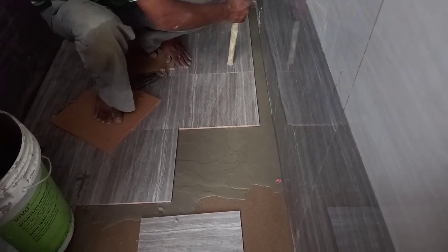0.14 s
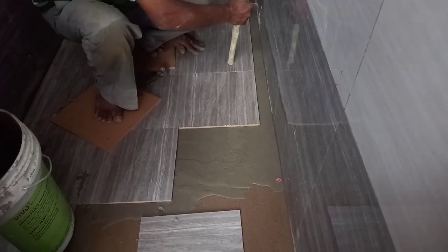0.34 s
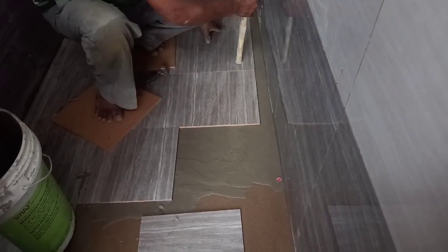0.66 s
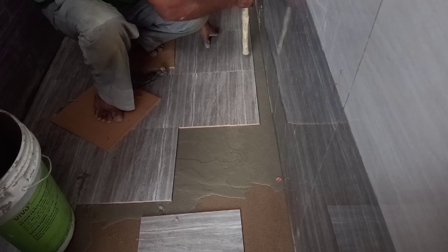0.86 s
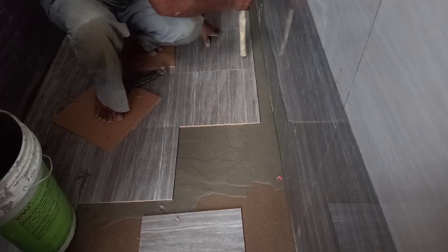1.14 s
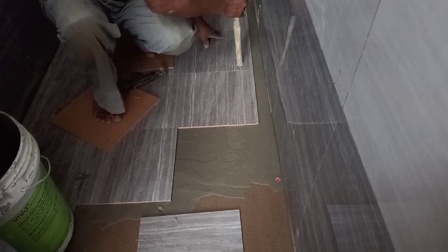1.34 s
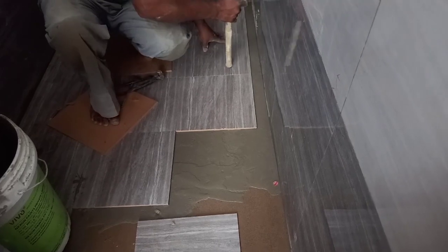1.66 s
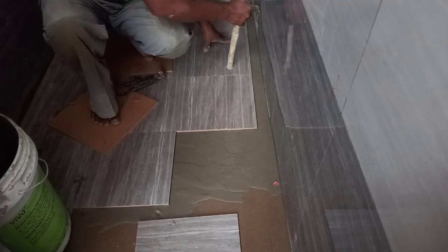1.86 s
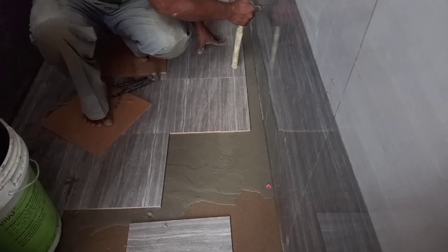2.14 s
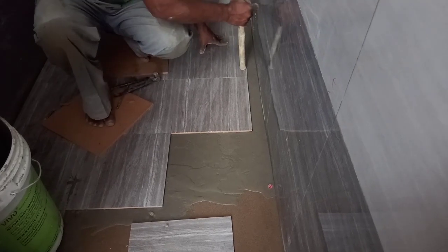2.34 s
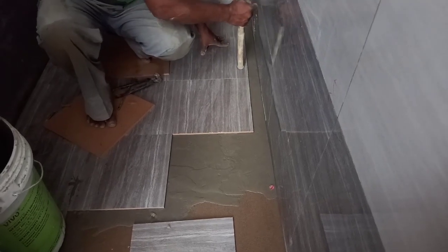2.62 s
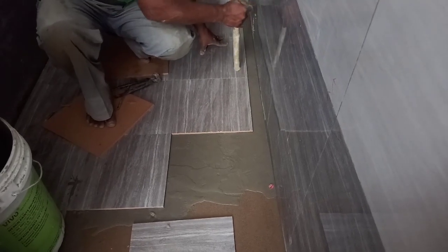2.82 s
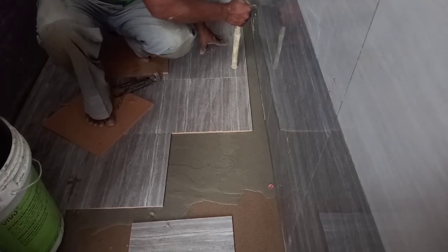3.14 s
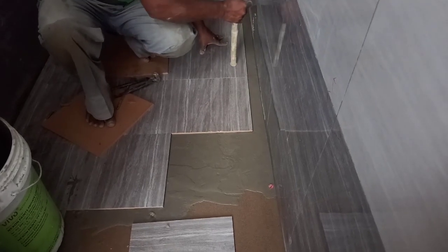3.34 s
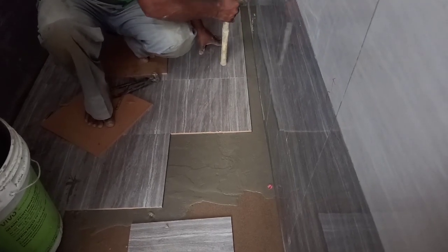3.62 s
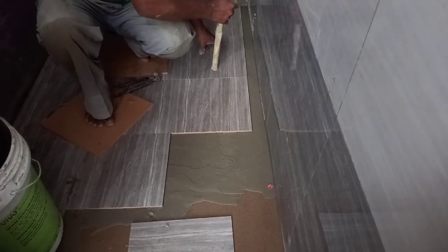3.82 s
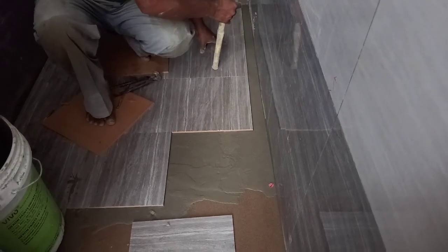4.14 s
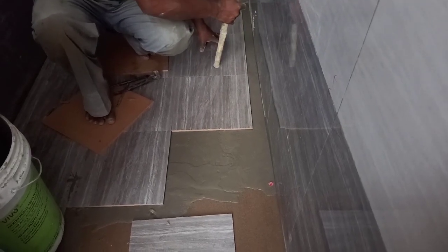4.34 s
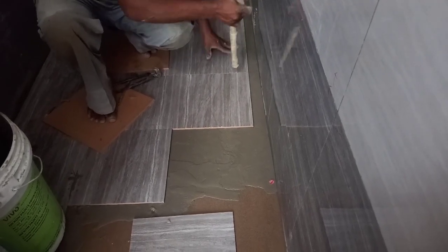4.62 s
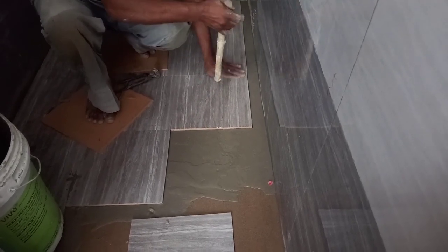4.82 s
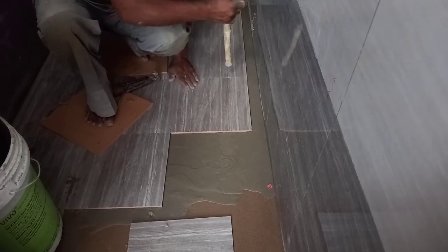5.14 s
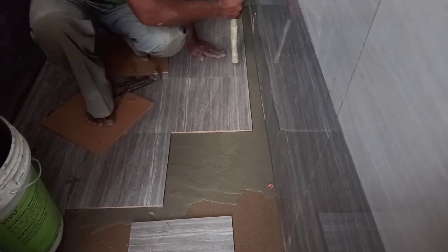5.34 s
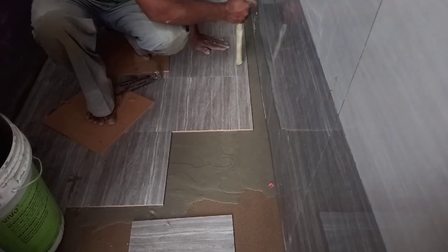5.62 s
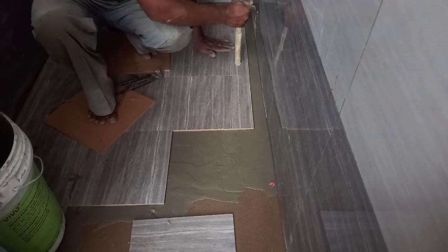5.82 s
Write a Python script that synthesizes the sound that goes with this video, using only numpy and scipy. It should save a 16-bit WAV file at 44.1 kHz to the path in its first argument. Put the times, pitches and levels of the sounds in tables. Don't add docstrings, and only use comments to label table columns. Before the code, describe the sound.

A small, bare, tiled room heard from about a metre away. From the start a far engine thumps and drones low through the walls, wavering in pitch and strength, with quiet room air and a soft breathy hiss that swells in short strokes. At 0.3 s a wooden handle begins knocking a floor tile into wet mortar: hard, hollow clacks with a gritty crack, a very brief tile ring and a short bright room echo. Blows come at 0.3, 0.65 and 0.95 s, then about every quarter second until 4.0 s, the last three stronger and duller. A pause follows, the drone growing and faint distant metal clanking and rattling from 4.2 s. Two more knocks land at about 5.2 and 5.4 s, then engine, hiss and further faint clanks from 5.6 s to the end at 6 s. Sound is on the left only, clipping on blows; the right holds faint steady electronic hiss.

```python
import sys
import numpy as np
from scipy import signal
from scipy.fft import rfft, irfft
from scipy.io import wavfile
from scipy.ndimage import uniform_filter1d

SR = 44100
rng = np.random.default_rng(int(sys.argv[2]) if len(sys.argv) > 2 else 0)


def to_wav(s):
    ch = np.atleast_2d(s).T
    pcm = np.round(np.clip(ch, -1, 1) * 32767)
    wavfile.write(sys.argv[1], SR, pcm.astype(np.int16))


def invert_db(level):
    return 10 ** (np.asarray(level, dtype=float) / 20)


N = 263718


def shape(x, points):
    hz, db = np.transpose(points)
    f = np.fft.rfftfreq(len(x), 1 / SR) + 1
    gain = invert_db(np.interp(np.log(f), np.log(hz), db))
    return irfft(rfft(x) * gain, len(x))


def level(x, db):
    return x * invert_db(db) / np.sqrt(np.mean(x ** 2))


def noise(colour):
    return shape(rng.standard_normal(N), colour)


def ring(t, hz, t60, phase=0):
    return np.sin(2 * np.pi * hz * t + phase) * np.exp(-np.log(1000) * t / t60)


def curve(rows):
    s, *columns = np.transpose(rows)
    return [np.interp(np.arange(N) / SR, s, c) for c in columns]


def walk(rate):
    k = int(SR / rate)
    steps = np.repeat(rng.standard_normal(N // k + 1), k)
    drift = uniform_filter1d(uniform_filter1d(steps, k), k)[:N]
    return drift / drift.std()


def engine(smear=0.57, rumble_db=-9):
    # (time [s], firing rate [Hz], thump level [dB], tenth-order drone level [dB])
    running = [(0, 17, -47.5, -49), (.5, 18.2, -43, -47), (1.5, 14.6, -51, -40.5), (2.5, 16.9, -42, -40.5),
               (3.5, 15.9, -43, -42), (4.2, 16.15, -39.5, -41.5), (4.5, 16.4, -40.5, -37.5),
               (4.8, 16.25, -42.5, -37), (5.1, 16.2, -37.5, -34.5), (5.5, 16.4, -36, -46),
               (5.98, 16.2, -35.5, -49)]
    # (order of the firing rate, level [dB])
    exhaust = [(5, -5), (6, -4.5), (7, -3.5), (8, 2.5), (9, -2.5), (10, -4), (11, -6), (12, -11), (13, -13),
               (14, -9.5), (15, -11.5), (17, -16), (18, -29), (20, -15.5)]
    # (frequency [Hz], gain [dB])
    rumble_colour = [(50, -23), (90, -5), (160, -9), (260, -19), (400, -23)]
    hz, thump_db, drone_db = curve(running)
    turns = 2 * np.pi * np.cumsum(hz / SR)
    orders = 0
    for order, db in exhaust:
        loudness = invert_db(db + 1.5 * walk(4))
        orders = orders + loudness * np.cos(np.round(order) * turns + smear * walk(.7))
    rumble = level(noise(rumble_colour), rumble_db)
    thump = level(orders, 0) + rumble
    drone = np.sqrt(2) * np.sin(10 * turns + .4 * walk(8)) * invert_db(1.5 * walk(10))
    return thump * invert_db(thump_db) + drone * invert_db(drone_db)


def hiss(gain_db=7, rise_db_s=117, fall_db_s=73, rest_db=-55.5):
    # (start of hold [s], hold [s], level [dB])
    strokes = [(0.0, 0.26, -51), (0.5, 0.041, -44), (1.23, 0.11, -48), (1.755, .12, -46),
               (2.64, 0.094, -43), (3.166, .2, -45.5), (3.6, 0.049, -52.5), (4.256, 0.1, -41.5),
               (4.46, 0.34, -45), (4.844, 0.24, -43), (5.313, 0.13, -46), (5.63, 0.061, -44),
               (5.826, .2, -42.5)]
    # (frequency [Hz], gain [dB])
    hiss_colour = [(700, -6.5), (2000, -15), (4000, -8.5), (7000, 2), (8300, 8), (8800, -8.5), (10500, -3),
                   (13500, -9)]
    t = np.arange(N) / SR
    envelope_db = np.full(N, rest_db)
    for s, hold, top_db in strokes:
        rise_db = rise_db_s * np.maximum(s - t, 0)
        fall_db = fall_db_s * np.maximum(t - s - hold, 0)
        envelope_db = np.maximum(envelope_db, top_db - rise_db - fall_db)
    return level(noise(hiss_colour), gain_db) * invert_db(envelope_db + walk(7.2))


def air():
    # (frequency [Hz], gain [dB])
    air_colour = [(50, 13), (90, -7), (200, 6.5), (500, -3.5), (1000, -1.5), (2500, -14), (15000, -47)]
    return level(noise(air_colour), -49.5) * invert_db(walk(27))


def crack(chance, crack_s=0.0019):
    # (frequency [Hz], gain [dB])
    crack_colour = [(600, -26), (1800, -74), (2800, 18), (4500, 13.5), (7000, 9), (9000, 6), (13000, -15)]
    decay = np.exp(-np.arange(len(chance)) / SR / crack_s)
    burst = rfft(chance * decay)
    return shape(irfft(burst / abs(burst), len(chance)), crack_colour)


def tail(t):
    # (frequency [Hz], t60 [s])
    room_decay = [(80, 0.86), (200, 0.65), (500, 0.42), (1200, 0.33), (3000, 0.32), (6000, .25),
                  (12000, 0.078)]
    # (frequency [Hz], gain [dB])
    tail_colour = [(100, -11), (200, 6.5), (400, 0), (800, 3.5), (1600, 4), (3000, 4.5), (6000, 4.5),
                   (14000, 30)]
    hz, t60 = np.transpose(room_decay)
    spectrum, out = rfft(rng.standard_normal(len(t))), 0
    octave = np.log2(np.fft.rfftfreq(len(t), 1 / SR) + 1)
    for centre in np.arange(6, 14.6, .5):
        band = irfft(spectrum * np.clip(1 - 2 * abs(octave - centre), 0, 1), len(t))
        band_t60 = np.interp(centre, np.log2(hz), t60)
        out = out + band * np.exp(-np.log(1000) * t / band_t60)
    return shape(out, tail_colour)


def room(t, count, tail_db=-33, modes_db=-49, early_db=-27, early_t60=0.092, spot_db=3.5, build_s=.004):
    # (delay [s], level [dB])
    echoes = [(.0017, -4), (.0046, -5), (.0097, -25.5), (.0167, -10.5), (.0282, -11.5)]
    # (frequency [Hz], level [dB], t60 [s])
    standing = [(89.2, -1, 0.7), (152.93, -0.5, 0.72), (183.1, 7.5, 0.45), (231, 0, 0.18), (267, -1, 0.14),
                (323.2, 1.5, 0.32), (395.2, 3.5, 0.27), (464.2, -5.5, 0.35), (536, -7, 0.39),
                (614, -15, 0.42), (656.6, -11.5, 0.45), (809, -3.5, 0.29), (882, -19.5, 0.83),
                (1072, -21, 0.48)]
    direct = np.zeros(len(t))
    direct[0] = 1
    for k, (s, db) in enumerate(echoes):
        direct[int(s * SR)] += (-1) ** (k + 1) * invert_db(db)
    scatter = np.exp(-np.log(1000) * t / early_t60)
    diffuse = []
    for _ in range(4):
        late = invert_db(tail_db) * tail(t)
        early = invert_db(early_db) * scatter * rng.standard_normal(len(t))
        diffuse.append(late + early)
    place = np.cumsum(.7 * rng.standard_normal((count, 4)), axis=0) + 1
    place = place / np.linalg.norm(place, axis=1, keepdims=True)
    phases = rng.uniform(0, 2 * np.pi, len(standing))
    modes = np.array([invert_db(db) * ring(t, f, t60, p) for (f, db, t60), p in zip(standing, phases)])
    excite = invert_db(modes_db + spot_db * rng.standard_normal((count, len(modes))))
    build = 1 - np.exp(-t / build_s)
    return direct + build * (place @ np.array(diffuse) + excite @ modes)


def knocks(gain_db=-10, contact_s=0.00037, crack_db=3, lag_s=0.00055):
    # (time [s], blow level [dB], hollowness [dB], snap [dB], grit [dB])
    blows = [(0.315, 1.5, -2.5, -1.5, -1), (0.654, 0, -1.5, -1.5, 1.5), (0.954, -0.5, 0.5, -2.5, -2),
             (1.231, 0, -3, 5, -2), (1.501, -1.5, -1, 3.5, 0.5), (1.758, 0, -0.5, -3.5, -1),
             (2.014, -1.5, 0, 0, 1.5), (2.28, -1.5, 0.5, 1, 1.5), (2.526, -0.5, 1.5, -1.5, 2),
             (2.774, -1.5, 3, 1.5, 4), (3.029, -2, 1, 1.5, 3), (3.282, -2, -1.5, 3.5, 1),
             (3.526, 2.5, -6, -2.5, -2), (3.778, 2, -6, -2, -3.5), (4.005, 3, -7, -3, -1.5),
             (5.165, -2.5, 2.5, -1, 1.5), (5.371, -0.5, -1, 1, 2.5)]
    # (frequency [Hz], level [dB], t60 [s])
    tile_modes = [(343, -6.5, 0.023), (660, 4.5, 0.0089), (835, 6, 0.0076), (1077, 6, .007),
                  (1608, 6.5, 0.0061), (2335, 5.5, 0.0044)]
    # (frequency [Hz], share of hollowness, share of snap, share of grit)
    knock_bands = [(180, 1, .3, 0), (380, 1, 0, 0), (850, 0, -.3, 0), (1700, 0, 1, 0), (3200, 0, 0, 1),
                   (5000, 0, 0, 1), (9000, 0, 0, .3)]
    lead = 400
    t = np.arange(2 ** 15) / SR
    touch = t[:2000]
    space = room(t, count=len(blows))
    out = np.zeros(N + len(t))
    hz, *shares = np.transpose(knock_bands)
    chance = rng.standard_normal((len(blows), 2, len(tile_modes)))
    detune = 1 + .08 * uniform_filter1d(chance[:, 0], size=3, axis=0)
    push = np.hanning(int(contact_s * SR) + 3)
    grit = rng.standard_normal((len(blows), 256))
    for k, (s, blow_db, *colour_db) in enumerate(blows):
        tile = 0
        for m, (f, db, t60) in enumerate(tile_modes):
            tile = tile + invert_db(db + chance[k, 1, m]) * ring(touch, f * detune[k, m], t60)
        source = np.convolve(-tile, push / push.sum())[:len(touch)]
        source = source + invert_db(crack_db) * np.pad(crack(grit[k]), (0, len(touch) - grit.shape[1]))
        blow = signal.fftconvolve(source, space[k])[:len(t) - lead]
        tone_db = blow_db + np.dot(colour_db, shares)
        blow = shape(np.pad(blow, (lead, 0)), list(zip(hz, tone_db)))
        start = int((s + lag_s) * SR) - lead
        out[start:start + len(t)] += blow
    small = signal.butter(2, 150, "high", fs=SR, output="sos")
    return invert_db(gain_db) * signal.sosfilt(small, out[:N])


def clanks(rise_s=.025):
    # (time [s], frequency [Hz], level [dB], t60 [s], rattle [radians])
    partials = [(4.2, 427, -42, 1, 1.3), (4.24, 272, -41, .6, 1), (4.28, 632, -42, .5, 2),
                (4.22, 558, -42, .8, 2.2), (4.38, 506, -43, .4, 2.1), (5.57, 948, -43, .65, .5),
                (5.58, 755, -46, .7, 1.4), (5.8, 633, -46, .4, 1.2), (5.87, 1670, -43, .2, .4),
                (5.87, 714, -33.5, .45, .2), (5.8, 435, -49, .6, 1.4), (5.92, 420, -42, .4, .4)]
    out = 0
    for s, hz, db, t60, rattle in partials:
        t = np.maximum(np.arange(N) / SR - s, 0)
        swell = 1 - np.exp(-t / rise_s)
        loudness = invert_db(db + 1.5 * rattle * walk(30))
        out = out + loudness * swell * ring(t, hz, t60, rattle * walk(40))
    return out


def scene():
    left = engine() + hiss() + air() + knocks() + clanks()
    return np.array([left, np.zeros(N)])


def amplifier_noise(db):
    # (frequency [Hz], gain [dB])
    amplifier_colour = [(45, -16), (85, -1), (200, 1), (500, -2), (1100, -6.5), (2400, -9.5), (4000, -8.5),
                        (16000, -8.5)]
    return level(noise(amplifier_colour), db)


def clip_treble_stepped(noisy, top_hz=15750):
    # (from frequency [Hz], gain [dB])
    treble_steps = [(0, 0), (4780, -8), (6130, -3), (6890, -6.5), (7660, -12), (8500, -16), (9050, -13.5),
                    (11600, -7.5)]
    f = np.fft.rfftfreq(N, 1 / SR)
    edge, db = np.transpose(treble_steps)
    gain = invert_db(db[np.searchsorted(edge, f, "right") - 1])
    clipped = np.clip(irfft(rfft(noisy) * gain, N), -1, 1)
    return irfft(rfft(clipped) * (f < top_hz), N)


def roll_off(x):
    return signal.sosfilt(signal.butter(12, 16440, fs=SR, output="sos"), x)


def record(dry):
    bass_cut = signal.butter(4, 74, "high", fs=SR, output="sos")
    left, right = signal.sosfilt(bass_cut, dry)
    noisy = np.array([left + amplifier_noise(-53.5), right + amplifier_noise(-46.6)])
    return roll_off(clip_treble_stepped(noisy))


dry = scene()
out = record(dry)
to_wav(out)
```